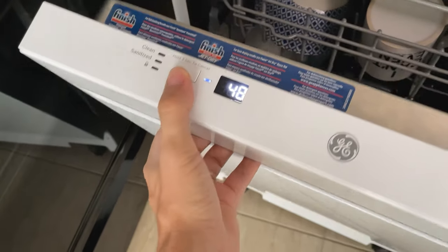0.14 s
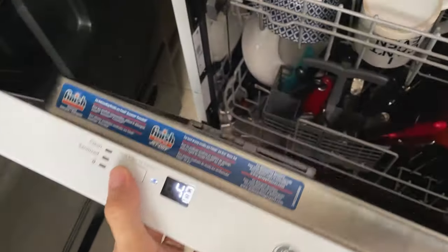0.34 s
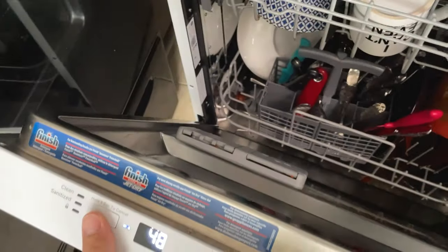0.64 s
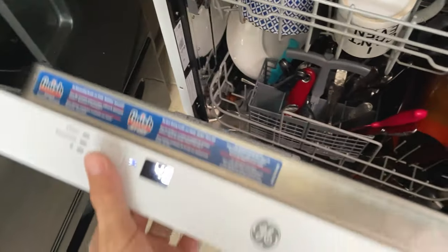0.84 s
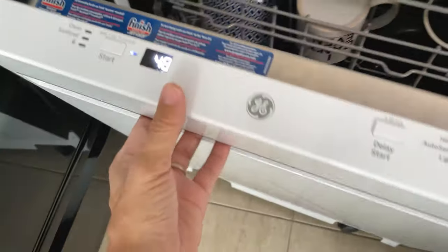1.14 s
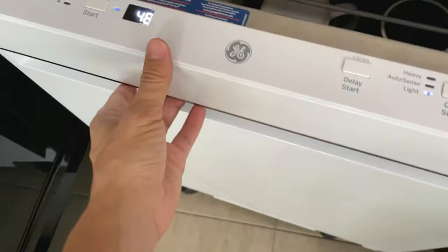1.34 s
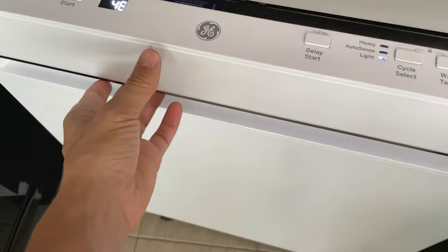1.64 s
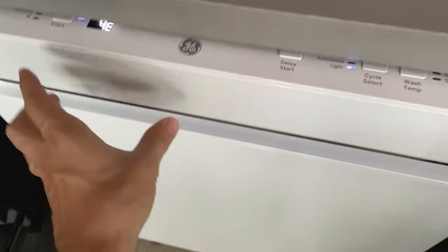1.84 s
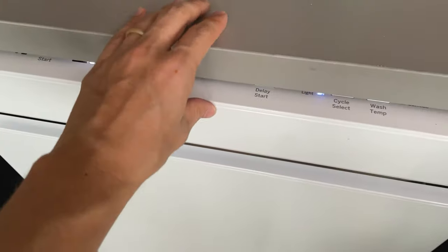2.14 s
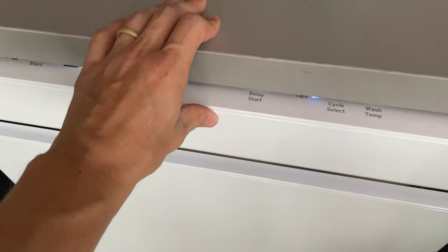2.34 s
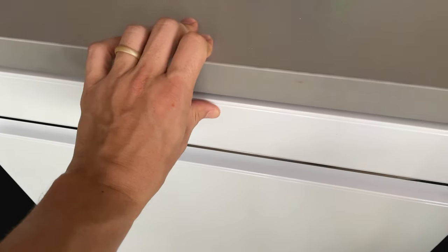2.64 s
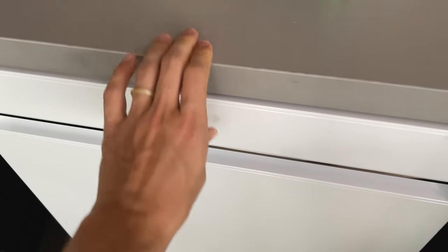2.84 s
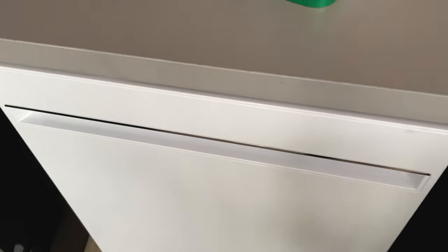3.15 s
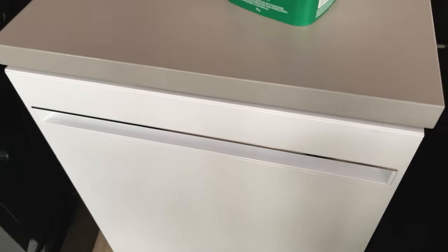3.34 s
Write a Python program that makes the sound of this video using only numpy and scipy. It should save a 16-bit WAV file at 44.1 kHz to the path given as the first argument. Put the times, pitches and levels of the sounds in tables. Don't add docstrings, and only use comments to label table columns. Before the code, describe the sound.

A dishwasher door closes in a kitchen, heard close by a phone: faint panel ticks and rubbing, a sharper knock, then a loud latch crack with deep boom, followed by small bright scrapes and a soft slide.

```python
import sys
import numpy as np
from scipy import signal
from scipy.io import wavfile
from scipy.ndimage import uniform_filter1d

SR = 44100
rng = np.random.default_rng(int(sys.argv[2]) if len(sys.argv) > 2 else 0)


def bounce(signal):
    frames = np.transpose(np.atleast_2d(signal))
    limited = np.clip(frames, -1, 1)
    pcm = np.round(limited * 32767).astype(np.int16)
    wavfile.write(sys.argv[1], SR, pcm)


def boost_factor(decibels):
    exponent = np.asarray(decibels, float) / 20
    return 10 ** exponent


N = 154350
T = np.arange(N) / SR

# (frequency [Hz], level per Hz [dB])
ROOM_SPECTRUM = [(24, 3.5), (70, -10), (130, -19.5), (260, -32.5), (480, -30.5), (1000, -40.5), (1900, -51),
                 (16000, -49)]
# (time [s], level [dB])
SHAKE = [(0, 0), (.15, 3.5), (.27, 1.5), (.55, 3.5), (.8, 2), (1.0, -2), (1.12, 4.5), (1.5, 4), (1.9, 1.5),
         (2.28, -2.5), (2.45, 8), (2.6, 13), (3.0, 0.5), (3.15, 9), (3.3, 4.5), (3.5, 1)]
# (time [s], pitch [Hz], level [dB])
HUM = [(0, 120, -71), (.22, 121, -62), (.28, 122, -46), (.45, 130, -52), (.62, 134, -47), (.9, 139, -57),
       (1.3, 133, -59), (2.0, 128.1, -56), (3.5, 128, -58.5)]
# (time [s], crack level [dB], panel level [dB], crack centre [Hz], contact [ms])
KNOCKS = [(.02, -75, -66, 1500, 6.5), (0.2138, -58, -57.5, 2020, 7.1), (0.4402, -57.5, -57.5, 2000, 6.4),
          (0.5944, -55, -55, 2360, 9.8), (0.674, -48.5, -63.5, 5700, 8), (0.9094, -45.5, -50.5, 5460, 3.8),
          (1.9475, -37.5, -41, 4200, 9), (1.962, -46, -44, 2970, 11), (2.03, -51.5, -60, 5000, 2.9),
          (2.149, -68, -61, 2500, 4.4), (2.3854, -74, -56, 2500, 4.7), (2.41, -55, -62, 4000, 3.4),
          (2.4202, -32, -43.5, 4500, 4.6), (2.552, -49, -52, 8000, 5.8), (2.558, -23.5, -36.5, 6840, 1.6),
          (2.5616, -16, -27, 7500, 3.3), (2.5674, -24, -36.5, 6500, 3.5)]
# (frequency [Hz], level [dB], T60 [s])
PANEL_MODES = [(187, -10, 0.22), (256.5, -13, 0.11), (404, -9, 0.051), (453, 0, 0.12), (517, -1, 0.082),
               (640, -11, 0.1), (729, -10, 0.042), (824, -12.5, 0.032), (1008, -12.5, 0.028),
               (1242, -14.5, 0.054)]
# (centre [Hz], level under the crack [dB], T60 [s])
RATTLE = [(1500, -31.5, 0.61), (2500, -22, 0.42), (4000, -21, .36), (6180, -21.5, 0.28),
          (10000, -22.5, 0.21), (14000, -30, .15)]
# (centre [Hz], level under the panel [dB], T60 [s])
THUD = [(152, -15.5, 1), (221, -6.5, 0.21), (366, -7.5, 0.55), (500, -3, 0.39), (750, -16.5, 0.77),
        (1010, -8.5, 0.31)]
# (start [s], length [s], level
# [dB], centre [Hz], width [Hz])
RUBS = [(0.084, 0.1, -68.5, 3300, 3000), (0.24, 0.2, -71, 2110, 450), (0.215, 0.21, -74, 3340, 900),
        (.62, 0.085, -61.5, 440, 500), (0.96, 0.21, -59.5, 9700, 10000), (1.315, 0.19, -66.5, 5750, 8050),
        (1.401, 0.081, -73, 3100, 300), (1.558, 0.026, -65.5, 4000, 4970), (1.611, 0.17, -66, 4900, 6500),
        (1.63, 0.078, -71, 3550, 900), (1.3, 0.47, -65, 468, 40), (1.39, 0.065, -63.5, 750, 600),
        (1.62, 0.1, -64.5, 800, 700), (1.78, 0.052, -66, 990, 400), (1.999, .25, -70.5, 1960, 300.4),
        (2.07, .1, -56.5, 198, 60), (2.14, .04, -59, 594, 300), (2.378, .017, -58, 2810, 100),
        (3.33, .17, -53.5, 100, 50), (1.768, 0.065, -57, 6700, 11300), (2.058, 0.068, -65, 9000, 8930),
        (2.145, 0.032, -62.5, 2670, 1500), (2.416, 0.034, -48.5, 1320, 1170),
        (2.474, 0.045, -57, 8750, 7000), (2.79, 0.25, -72, 1900, 299), (2.86, 0.067, -66, 8900, 9000),
        (3.032, 0.11, -65, 1399, 500), (3.03, 0.081, -56.5, 506, 300), (3.117, .15, -52, 550, 70),
        (3.126, 0.14, -56.5, 750, 200), (3.177, 0.045, -61.5, 3860, 140), (3.18, .025, -61, 4500, 900),
        (3.174, 0.06, -59, 10000, 11900), (3.022, .06, -61, 2500, 1000), (2.44, .12, -58, 900, 1200),
        (.59, .06, -58, 340, 120), (1.1, .1, -62, 400, 150), (3.249, 0.24, -64.5, 770, 880)]
# (start [s], length [s], level [dB], centre [Hz], width [Hz])
SLIDE = (3.26, .24, -62, 9500, 13000)
# (time [s], pitch [Hz])
HINGE_PITCH = [(.215, 6800), (0.245, 7900), (.265, 7550), (.3, 7050), (.33, 7400), (.357, 7900),
               (.385, 7150), (.41, 6950)]
# (time [s], level [dB], sign [+1 or -1], push [ms], damped after [s])
BOOMS = [
    (1.9724, -21, 1, 11.3, 0.152),
    (2.545, -26, 1, 20, .02),
    (2.565, -3.5, -1, 13, 0.37),
]
# (frequency [Hz], level [dB], T60 [s])
TUB_MODES = [(25.8, -3.5, 1.41), (28.8, -23, 0.23), (44.8, -3, 0.2), (73, -9, 0.3), (118.8, -13, 0.69)]
# (start [s], length [s], pitch [Hz], level [dB])
SQUEAKS = [
    (2.476, .065, 1712, -53),
]
SQUEAK_HARMONICS_DB = [-3, -2, -1, -26, -16]
# (time [s], level [dB], hold [ms], resonance spacing [Hz], broad grit level [dB])
SCRAPES = [
    (3.0267, -39, 27, 2406, -8),
    (3.0775, -39.5, 18, 2580, -5.5),
    (3.13, -57.5, 30, 2460, 0.5),
    (3.2278, -41.5, 17, 2580, -4),
    (3.3187, -63, 62, 2640, 4),
]
SCRAPE_RESONANCES_DB = [-16, -13, -1, -1.5, -5.5, -14]


def unit(x):
    return x / np.sqrt(np.mean(x ** 2))


def band(x, hz, width):
    hz = min(hz, 0.45 * SR)
    return signal.lfilter(*signal.iirpeak(hz, hz / width, SR), x)


def steep(x, hz, width):
    return unit(band(band(x, hz, width), hz, width))


def walk(rate):
    k = int(SR / rate)
    steps = np.repeat(rng.standard_normal(N // k + 1), k)
    return unit(uniform_filter1d(uniform_filter1d(steps, k), k)[:N])


def sine(hz):
    return np.sin(2 * np.pi * np.cumsum(hz) / SR)


def ring(x, modes, phases):
    out = 0
    for (hz, db, t60), phase in zip(modes, phases):
        pole = np.exp(2j * np.pi * hz / SR - np.log(1000) / (t60 * SR))
        swing = signal.lfilter([1], [1, -pole], x + 0j)
        out = out + boost_factor(db) * (np.exp(1j * phase) * swing).real
    return out


def tail(t, bands, hz):
    out = 0
    for centre, db, t60 in bands:
        dulling_db = 11.0 * max(np.log2(centre / hz) - 0.5, 0)
        noise = steep(rng.standard_normal(len(t)), centre, centre / 2)
        out = out + boost_factor(db - 60 * t / t60 - dulling_db) * noise
    return out * (1 - np.exp(-t / 0.0013))


def add(out, at, x):
    i = int(at * SR)
    out[i:i + len(x)] += x[:N - i]


def room():
    rumble = 0
    spectrum_hz, spectrum_db = np.array(ROOM_SPECTRUM).T
    shake_db = np.interp(T, *np.array(SHAKE).T)
    for hz in 18 * 2 ** np.arange(0, 10, 0.5):
        db = np.interp(np.log(hz), np.log(spectrum_hz), spectrum_db) + 10 * np.log10(hz)
        db = db + shake_db * np.clip(60 / hz, 0, 1) + 1.0 * walk(7.98)
        rumble = rumble + boost_factor(db) * steep(rng.standard_normal(N), hz, hz / 2)
    rumble = rumble - 0.6 * band(rumble, 97, 30)
    drone = boost_factor(-49) * steep(rng.standard_normal(N), 70, 8)
    hum_s, hum_hz, hum_db = np.array(HUM).T
    hum = sine(np.interp(T, hum_s, hum_hz) + 0.76 * walk(6.35))
    hum = hum * boost_factor(np.interp(T, hum_s, hum_db) + 3 * walk(9))
    return boost_factor(-39) * unit(rumble) + drone + hum


def knocks():
    latch_hz, latch_width_hz, latch_db = 3280, 800, -5
    dip_hz, dip_width_hz = 1900, 990
    panel_contact = 1.98
    snap_db = 28
    out, t = np.zeros(N), T[:SR // 2]
    for at, crack_db, panel_db, hz, ms in KNOCKS:
        contact = (1 - np.exp(-t / 0.00046)) * np.exp(-t * 1000 / ms)
        grit = rng.standard_normal(len(t))
        latch = boost_factor(latch_db) * steep(grit, latch_hz, latch_width_hz)
        crack = (steep(grit, hz, 1.17 * hz) + latch) * contact + tail(t, RATTLE, hz)
        crack = crack - 0.44 * band(crack, dip_hz, dip_width_hz)
        grinding = rng.standard_normal(len(t)) * contact ** (1 / panel_contact)
        phases = rng.uniform(0, 2 * np.pi, len(PANEL_MODES))
        panel = ring(boost_factor(snap_db) * (t == 0) + grinding, PANEL_MODES, phases)
        panel = panel / panel[:SR // 20].std()
        thud = tail(t, THUD, SR)
        add(out, at, boost_factor(crack_db) * crack + boost_factor(panel_db) * (panel + thud))
    return out


def rubs():
    out = np.zeros(N)
    for at, length, db, hz, width in RUBS + [SLIDE]:
        n = int(length * SR)
        unevenness = boost_factor(1.1 * walk(37.0) + 2.5 * walk(500))
        hiss = unit(steep(rng.standard_normal(N), hz, 1.34 * width) * unevenness)[:n]
        add(out, at, boost_factor(db) * hiss * np.hanning(n) ** 0.6)
    return out


def hinge():
    s, hz = np.array(HINGE_PITCH).T
    on = uniform_filter1d(1. * ((T > s[0]) & (T < s[-1])), size=800)
    pitch = uniform_filter1d(np.interp(T, s, hz), size=500)
    return boost_factor(-77 + 1 * walk(60)) * on * sine(pitch)


def booms():
    gust_db, damped_t60_s = 42, 0.38
    out, t = np.zeros(N), T[:SR]
    for at, db, sign, ms, free_s in BOOMS:
        shape = np.hanning(int(ms * SR / 1000))
        push = np.r_[shape / shape.sum(), np.zeros(SR - len(shape))]
        swing = ring(push, TUB_MODES, np.zeros(len(TUB_MODES))) + boost_factor(gust_db) * push
        damping_db = 60 * np.maximum(t - free_s, 0) / damped_t60_s
        add(out, at, np.sign(sign) * swing * boost_factor(db - damping_db))
    return out


def squeaks():
    out = np.zeros(N)
    for at, length, hz, db in SQUEAKS:
        n = int(length * SR)
        pitch = hz * (1 + 0.004 * walk(200)[:n])
        tone = sum(boost_factor(d) * sine((k + 1) * pitch) for k, d in enumerate(SQUEAK_HARMONICS_DB))
        add(out, at, boost_factor(db) * tone * np.hanning(n) ** 0.5 * boost_factor(np.linspace(3, -9, n)))
    return out


def scrapes():
    width_hz, gap_t60_s, grit_t60_s = 780, 0.29, 0.12
    sag_db_per_s = 250
    out, t = np.zeros(N), T[:SR // 3]
    for at, db, ms, spacing_hz, grit_db in SCRAPES:
        grit = rng.standard_normal(len(t)) * boost_factor(2 * walk(1500)[:len(t)])
        gap = 0
        for k, d in enumerate(SCRAPE_RESONANCES_DB):
            gap = gap + boost_factor(d) * steep(grit, spacing_hz * (k + 1), width_hz)
        after = np.maximum(t - ms / 1000, 0)
        gap = unit(gap) * boost_factor(-60 * after / gap_t60_s)
        broad = boost_factor(grit_db - 60 * after / grit_t60_s) * steep(grit[::-1], 10000, 9000)
        level_db = db - 3 * (after > 0) - sag_db_per_s * (t - after) - 120 * after
        add(out, at, boost_factor(level_db) * (gap + broad) * np.minimum(t / 0.0005, 1))
    return out


def kitchen(x):
    low_db, low_t60_s = -18, 0.74
    top_db, top_t60_s = -25.5, 0.48
    t = T[:SR]
    noise = rng.standard_normal((2, SR))
    low = signal.lfilter(*signal.butter(1, 3500, fs=SR), noise[0]) * boost_factor(low_db - 60 * t / low_t60_s)
    top = noise[1] * boost_factor(top_db - 60 * t / top_t60_s)
    return signal.fftconvolve(x, (low + top) * np.minimum(t / 0.0017, 1) / 30)[:N]


def scene():
    near = knocks() + rubs() + hinge() + squeaks() + scrapes()
    return (near + kitchen(near) + booms() + room())[None]


def low_pass(x):
    return signal.sosfilt(signal.butter(12, 16670, fs=SR, output="sos"), x)


def record(dry):
    x = signal.lfilter(*signal.butter(2, 16, "high", fs=SR), dry)
    x = signal.sosfilt(signal.ellip(6, 0.5, 20, 15750, fs=SR, output="sos"), x)
    return low_pass(x)


dry = scene()
out = record(dry)
bounce(out)
```